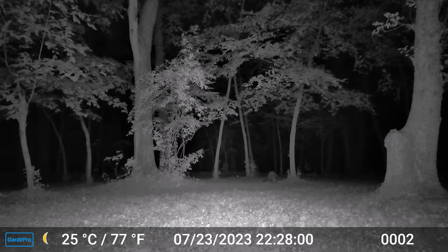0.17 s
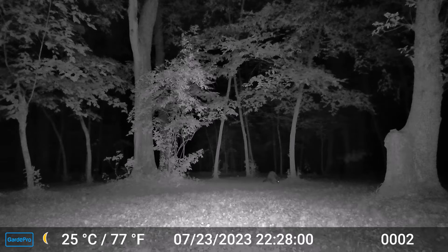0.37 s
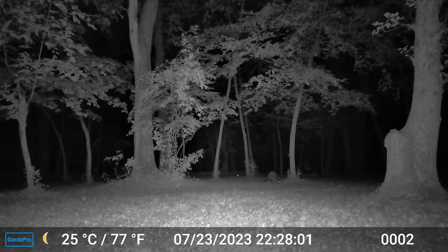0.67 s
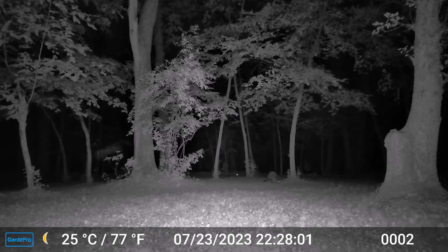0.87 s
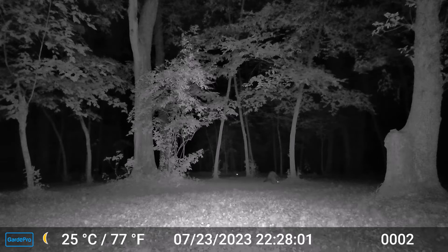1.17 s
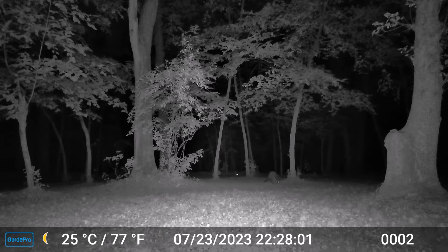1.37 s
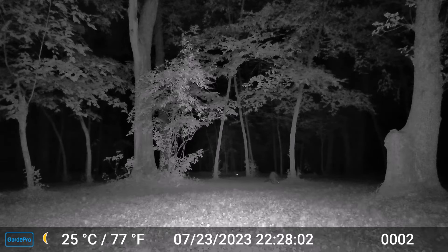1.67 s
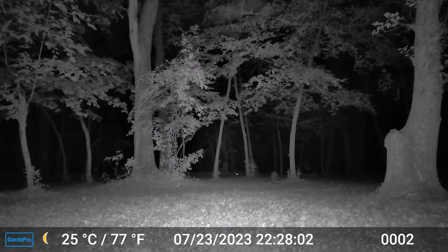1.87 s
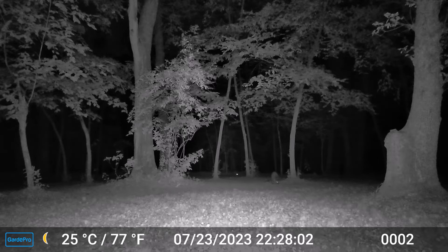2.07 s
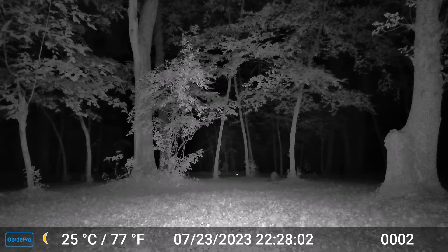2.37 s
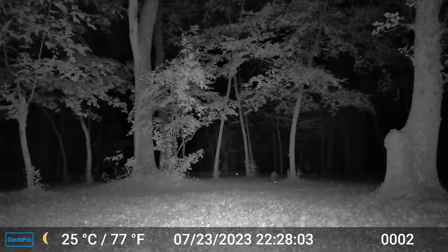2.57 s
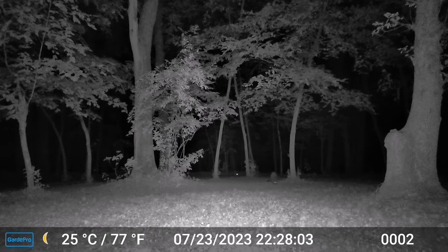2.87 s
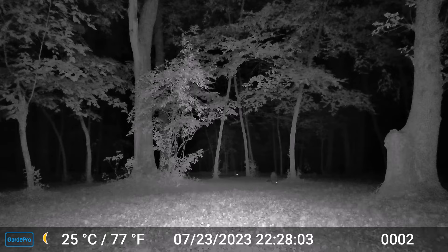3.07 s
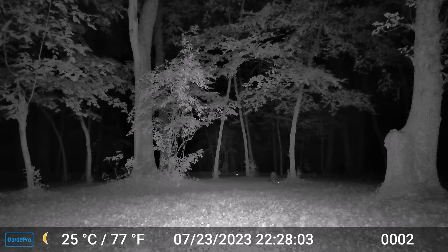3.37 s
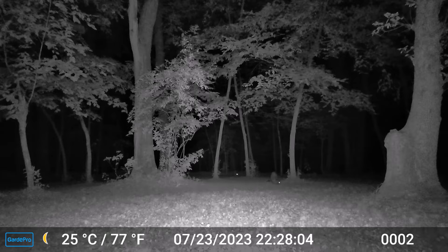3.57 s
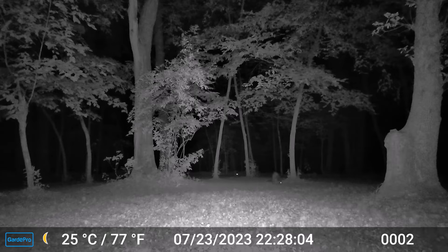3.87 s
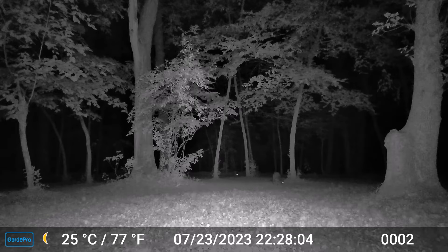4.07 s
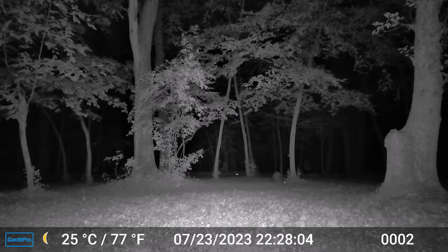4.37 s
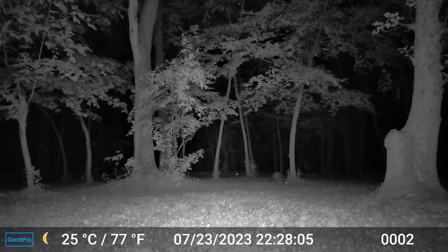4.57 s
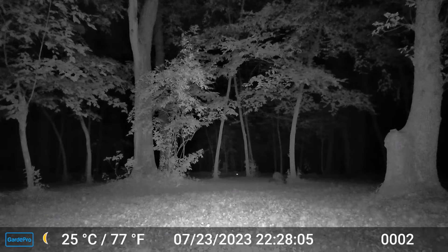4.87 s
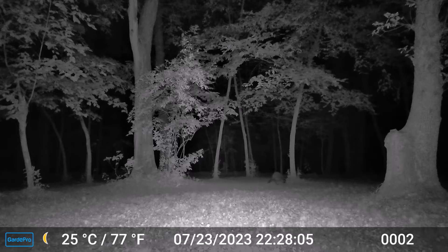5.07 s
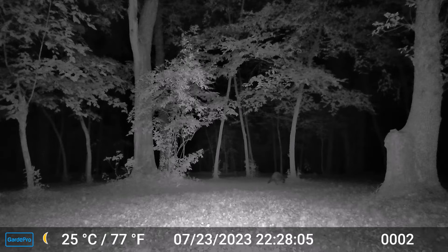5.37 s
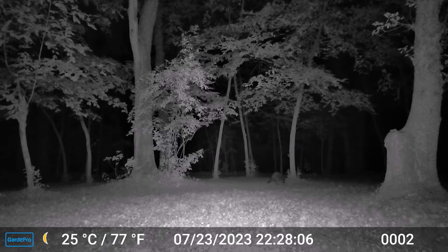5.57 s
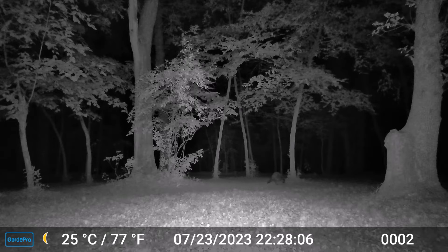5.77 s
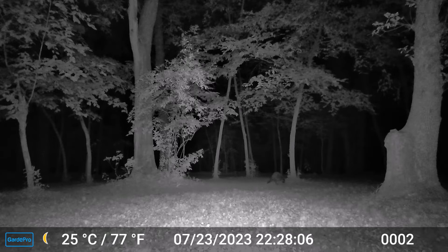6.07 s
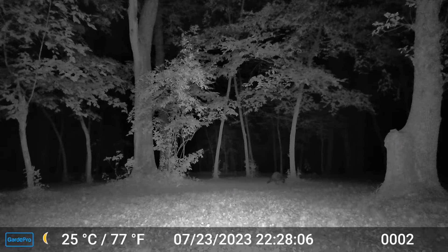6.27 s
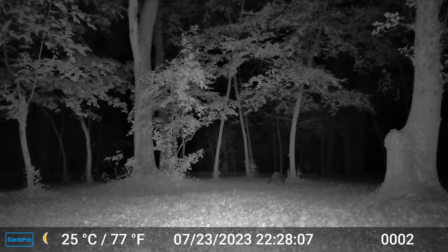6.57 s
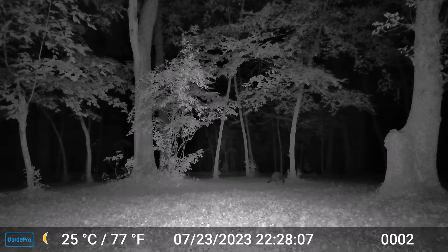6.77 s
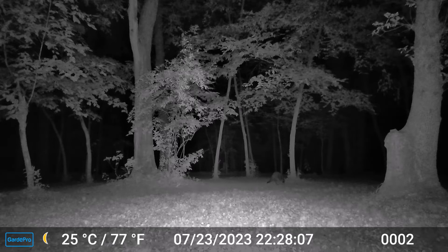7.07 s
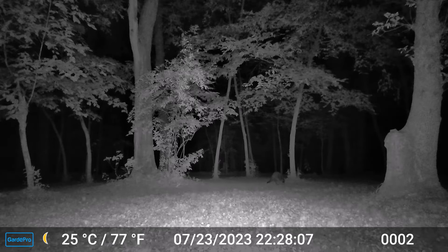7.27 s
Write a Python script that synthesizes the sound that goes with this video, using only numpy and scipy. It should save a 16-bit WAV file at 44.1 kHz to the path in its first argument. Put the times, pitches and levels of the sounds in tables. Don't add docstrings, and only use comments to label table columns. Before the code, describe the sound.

A wooded clearing at night, heard by a small fixed outdoor microphone with dull upper treble and brief digital thinning. A distant katydid is finishing a call at the start while a cricket trills high, near 4.8 kHz. From 0.4 to 1.2 s a near katydid rasps six dry, toothy pulses, buzzing broadly around 2 to 6 kHz with a short woody tail. It returns for its longest phrase at 2.2-3.3 s, again at 4.5-5.4 s, fading away, and at 6.8-7.4 s, growing. Softer, blurred answers come around 1.3-1.6, 2.7-3.5, 4.6-5.0 and 6.2-6.6 s, with a still fainter caller near 1.9, 4 and 5.9 s. Cricket chirps cluster around 0-0.4, 1.4-2.1, 3.4-4.4, 5.5-6.6 and 7.2 s. Throughout, low breeze rumble and irregular soft thumps, strongest before 3.2 s, sit under faint leaf hush, distant drone and high insect chorus.

```python
import sys
import numpy as np
from scipy import signal
from scipy.fft import rfft, irfft, next_fast_len
from scipy.io import wavfile
from scipy.ndimage import uniform_filter1d, map_coordinates

SR = 44100
rng = np.random.default_rng(int(sys.argv[2]) if len(sys.argv) > 2 else 0)


def log_audio(samples):
    frames = np.atleast_2d(samples).T
    limited = np.clip(frames, -1, 1)
    pcm = np.round(limited * 32767).astype(np.int16)
    wavfile.write(sys.argv[1], SR, pcm)


def invert_db(level):
    return 10 ** (np.asarray(level, dtype=float) / 20)


N = 326781


def unit(x):
    return x / np.sqrt(np.mean(x ** 2) + 1e-20)


def along(points, hz):
    f, v = np.transpose(points)
    return np.interp(np.log(hz + 1), np.log(f + 1), v)


def curve(rows):
    return np.interp(np.arange(N) / SR, *np.transpose(rows))


def wobble(rate):
    knots = rng.standard_normal(int(N * rate / SR) + 4)
    return map_coordinates(knots, [np.arange(N) * rate / SR])


def filtered(x, response):
    m = next_fast_len(N + SR // 2)
    return irfft(rfft(x, m) * response(np.fft.rfftfreq(m, 1 / SR)), m)[:N]


def noise(spectrum):
    return unit(filtered(rng.standard_normal(N), lambda hz: invert_db(along(spectrum, hz))))


def resonant(x, modes):
    def response(f):
        rings = []
        for k, (centre, width, db) in enumerate(modes):
            pole = 1j * f * width / (centre * centre - f * f + 1j * f * width)
            rings.append((-1) ** k * invert_db(db) * pole ** 2)
        rings = np.array(rings)
        size = np.sqrt(np.sum(np.abs(rings) ** 2, axis=0))
        return size * np.exp(1j * np.angle(rings.sum(axis=0)))
    return unit(filtered(x, response))


def repeats(phrases, spacing, swell_db, uneven_db):
    rows = []
    for k, (first, last, first_db, last_db) in enumerate(phrases):
        place = np.linspace(0, 1, round((last - first) / spacing) + 1)
        db = first_db + (last_db - first_db) * place + swell_db * np.sin(np.pi * place)
        db = db + uneven_db * rng.standard_normal(len(place))
        rows.append([first + (last - first) * place, db, place, np.full(len(place), k)])
    return np.concatenate(rows, axis=1)


def strokes(times, dbs, rise, fall, edge):
    t = np.arange(N) / SR
    gain = np.zeros(N)
    for s, db in zip(times, dbs):
        near = slice(max(0, int((s - .15) * SR)), int((s + .15) * SR))
        late = t[near] - s
        gain[near] += invert_db(db) * np.exp(-np.abs(late / np.where(late < 0, rise, fall)) ** edge)
    return gain


def file_teeth(rate, scatter, size_db, hiss):
    spacing, size = rng.standard_normal((4000, 2)).T
    at = (np.cumsum(np.clip(1 + scatter * spacing, .2, 3)) * SR / rate).astype(int)
    ticks = np.bincount(at[at < N], invert_db(size_db * size[at < N]), N)
    return unit(ticks - ticks.mean()) + hiss * rng.standard_normal(N)


def wood(x, t60, wet_db):
    t = np.arange(SR) / SR
    tail = rng.standard_normal(SR) * invert_db(-60 * t / t60) * (1 - np.exp(-t / 0.0023))
    trembling = unit(wobble(90))
    return x + invert_db(wet_db) * signal.fftconvolve(x * trembling, tail / np.linalg.norm(tail))[:N]


def wavelets(times, dbs, hz, length, fall):
    out = np.zeros(N)
    phases = rng.uniform(0, 2 * np.pi, len(times))
    for s, db, f, d, phase in np.broadcast(times, dbs, hz, length, phases):
        n = np.arange(int((s - 1.5 * d) * SR), min(N, int((s + 1.5 * d) * SR)))
        u = (n / SR - s) / d
        cycles = f * d * (u - fall * u ** 2 / 4)
        out[n] += invert_db(db) * np.exp(-2 * u ** 2) * np.sin(2 * np.pi * cycles + phase)
    return out


def near_katydid():
    # (first [s], last [s], first level [dB], last level [dB])
    phrases = [
        (.443, 1.195, -38.5, -38.5),
        (2.192, 3.253, -37, -38.5),
        (4.492, 5.4, -36.5, -42.5),
        (6.812, 7.422, -39.5, -36),
    ]
    lower_hz = [1540, 1640, 2050, 2110, 2180, 2310, 2500, 2680]
    middle_hz = [2908, 3037, 3146, 3250, 3345, 3545, 3500, 3751, 3900]
    upper_hz = [4161, 4275, 4421, 4620, 4720, 4825, 4959, 5168, 5370, 5558, 5698, 6000, 7250]
    # (width [Hz], level [dB])
    lower_ring = [(80, -28.5), (80, -22), (80, -8), (71, -11), (70, -14), (90, -13.5), (90, -11),
                  (122, -12)]
    middle_ring = [(72, -7.5), (90, -9.5), (36.6, -1), (140, -8.5), (50, -11.5), (50, -9), (500, -18),
                   (59.7, -13), (300, -16)]
    upper_ring = [(90, -6.5), (44, -4), (80, -8), (113, -3.5), (141, -8.5), (100, -9), (50, -5),
                  (199, -18.5), (167, -10), (60, -17.5), (49.7, -11.5), (490, -27.5), (298, -37)]
    # (first level [dB], last level [dB])
    upper_phrase = [(4, -1), (2.5, 0), (1.3, 1.9), (4.5, -0.7)]
    lower_phrase = [(0.53, 0.9), (1, -1), (.2, -0.5), (.3, -0.4)]

    s, db, place, phrase = repeats(phrases, spacing=.151, swell_db=1.5, uneven_db=.25)

    def effort(cell):
        first, last = np.array(cell)[phrase.astype(int)].T
        return db + first * (1 - place) + last * place

    def ring(modes):
        return resonant(file_teeth(rate=330, scatter=.15, size_db=3, hiss=.5), modes)

    upper_db, lower_db = effort(upper_phrase), effort(lower_phrase)
    low, high = np.c_[lower_hz, lower_ring], np.c_[upper_hz, upper_ring]
    lower = strokes(s - .008, lower_db - 7.5, rise=.036, fall=.042, edge=1.97) * invert_db(2.44 * wobble(50))
    low_rim = strokes(s + .018, lower_db - 13.5, rise=.028, fall=.026, edge=1.8) * invert_db(2.4 * wobble(40))
    middle = strokes(s + .011, db + 3.5, rise=.037, fall=.03, edge=1.94) * invert_db(1.8 * wobble(45))
    upper = strokes(s + .001, upper_db - .6, rise=.047, fall=.039, edge=2.97) * invert_db(.85 * wobble(60))
    rim_db = upper_db - 5.5 - 3.5 * place
    high_rim = strokes(s + .0086, rim_db, rise=.043, fall=.031, edge=1.8) * invert_db(2.2 * wobble(30))

    wings = lower * ring(low[:5]) + low_rim * ring(low[5:])
    wings += middle * ring(np.c_[middle_hz, middle_ring])
    wings += upper * ring(high[:7]) + high_rim * ring(high[7:])
    return wood(wood(wings, t60=.5, wet_db=-10.5), t60=1.6, wet_db=-21)


def far_katydid(phrases, wing, late, rise, fall, level_db, wet_db):
    s, db = repeats(phrases, spacing=.157, swell_db=.6, uneven_db=.6)[:2]
    teeth = file_teeth(rate=280, scatter=.3, size_db=3, hiss=1.5)
    song = strokes(s + late, db + level_db, rise, fall, edge=2.6) * resonant(teeth, wing)
    return wood(song, t60=.4, wet_db=wet_db)


def second_katydid():
    # (first [s], last [s], first level [dB], last level [dB])
    phrases = [
        (.001, .162, -48, -50.5),
        (1.335, 1.645, -52, -51),
        (2.73, 3.483, -42, -52),
        (4.57, 5.03, -42.5, -50),
        (6.195, 6.64, -48, -48),
    ]
    # (pitch [Hz], width [Hz], level [dB])
    low_wing = [(2200, 150, -1), (2370, 190, 0), (2560, 190, -3)]
    high_wing = [(2700, 200, -5), (2950, 250, -5), (3270, 170, 0), (3480, 180, -2.5)]
    lower = far_katydid(phrases, low_wing, late=-.003, rise=.042, fall=.022, level_db=-1.5, wet_db=-6)
    upper = far_katydid(phrases, high_wing, late=.008, rise=.042, fall=.025, level_db=-3, wet_db=-5)
    return lower + upper


def third_katydid():
    # (first [s], last [s], first level [dB], last level [dB])
    phrases = [
        (.329, .33, -62, -62),
        (1.802, 1.954, -62, -63),
        (3.731, 4.218, -58, -59.5),
        (5.7, 6.041, -63, -62),
    ]
    # (pitch [Hz], width [Hz], level [dB])
    wing = [(2960, 350, -3), (3200, 300, 9)]
    return far_katydid(phrases, wing, late=.004, rise=.035, fall=.025, level_db=-3, wet_db=-8)


def cricket():
    # (first pulse [s], last pulse [s], first level [dB], last level [dB])
    chirps = [(.025, .157, -53, -62), (.187, .352, -50.5, -56.5), (1.352, 1.53, -52, -56),
              (1.637, 1.84, -54, -62), (1.875, 2.108, -66, -45.5), (3.384, 3.563, -53, -56.5),
              (3.628, 3.818, -55.5, -56.5), (3.872, 4.067, -55.5, -55), (4.155, 4.36, -55.5, -54),
              (5.49, 5.6, -55, -61.5), (5.659, 5.83, -50, -60), (5.875, 6.05, -52, -58.5),
              (6.135, 6.31, -55.5, -56.5), (6.37, 6.625, -53, -59), (7.17, 7.235, -48.5, -52)]
    # (frequency [Hz], level per Hz [dB])
    trill = [(4600, -30), (4750, -5), (4840, 0), (4930, -5), (5080, -30)]
    s, db = repeats(chirps, spacing=.034, swell_db=4, uneven_db=1.2)[:2]
    late, sharp = rng.standard_normal((len(s), 2)).T
    pulses = wavelets(s + .002 * late, db, 4840 * (1 + .004 * sharp), length=.013, fall=.085)
    return wood(pulses, t60=.18, wet_db=-3.5) + invert_db(-64 + 2 * wobble(30)) * noise(trill)


def breeze():
    # (time [s], peak level [dB], pitch [Hz])
    bumps = [(.087, -35.5, 74.5), (.387, -31.5, 81), (.753, -26, 83.5), (.899, -32.5, 92.5),
             (1.095, -31, 85), (1.221, -30.5, 93), (1.317, -30.5, 100), (1.566, -33.5, 103),
             (1.849, -32.5, 101.5), (1.917, -32, 103), (2.127, -30.5, 89), (2.424, -34, 90),
             (2.516, -33, 80), (2.624, -28.5, 76.4), (2.817, -34, 80.6), (2.948, -34, 75.7),
             (3.017, -31.5, 121), (3.048, -29, 118), (3.129, -28, 60), (3.404, -33.5, 84),
             (3.443, -30.5, 78), (4.018, -31.5, 76), (4.177, -31, 90), (4.667, -34.5, 110),
             (5.026, -30.5, 117), (5.234, -33.5, 86.4), (5.395, -33, 78), (5.694, -36, 90),
             (7.064, -33.5, 81), (7.218, -32, 74.4)]
    # (time [s], level [dB])
    gusts = [(0, -51), (.6, -51.5), (.91, -49.5), (1.4, -52), (1.75, -47.5), (2.08, -49), (3.0, -45.5),
             (3.8, -51), (4.4, -50), (5, -47.5), (5.6, -51), (6.2, -52.5), (7.41, -51.5)]
    # (frequency [Hz], level per Hz [dB])
    rumble_band = [(12, -35.5), (20, -10.5), (54, 0), (86, -3), (141, -5.5), (260, -25), (340, -62.5),
                   (570, -120)]
    gust_db = curve(gusts)
    eddies = 64
    when, size, pitch = rng.uniform(size=(eddies, 3)).T
    at = (np.arange(eddies) + when) / eddies * N / SR
    over_mean = gust_db[(at * SR).astype(int)] - gust_db.mean()
    small_db = -39.5 + 1.1 * over_mean + 8 * (size - .5)
    small = np.c_[at, small_db, 62 * 2.1 ** pitch]
    s, db, hz = np.r_[bumps, small].T
    rumble = invert_db(gust_db + 2.4 * wobble(12)) * noise(rumble_band)
    return wavelets(s, db - .5, hz, length=1.03 / hz, fall=.1) + invert_db(2.5) * rumble


def background():
    # (time [s], level [dB])
    drone_swell = [(0, -61), (.49, -62.5), (.8, -57), (1.46, -63), (2.08, -52), (2.66, -58.5),
                   (3.82, -58.5), (4.35, -65), (5.04, -56), (5.57, -60), (6.38, -65), (6.81, -62.5),
                   (7.41, -63.5)]
    # (frequency [Hz], level per Hz [dB])
    drone_band = [(150, -9.5), (230, -4.5), (300, -5), (400, -3), (480, -8.5), (600, -21), (900, -58)]
    chorus_band = [(5200, -42), (5800, -9), (6300, -1), (6850, -6.5), (7200, -18), (7800, -35.5)]
    hush_band = [(100, -12), (500, -6.5), (700, -6.5), (1300, -10), (2000, -3.5), (2500, -7), (3000, 1),
                 (3700, -6.5), (4500, -1), (4850, -1.5), (5500, -8.5), (7000, -19.5), (7800, -24),
                 (8400, -65)]
    # (time [s], peak level [dB], pitch [Hz], length [s])
    groans = [
        (2.4, -57, 450, .06),
        (5.025, -46, 350, .022),
        (3.68, -59, 420, 0.027),
    ]
    drone = invert_db(curve(drone_swell) - 2.17 + 1.9 * wobble(10)) * noise(drone_band)
    drone += wavelets(*np.transpose(groans), fall=-.06)
    chorus = invert_db(-62.5 + .44 * wobble(2.9) + .24 * wobble(36)) * noise(chorus_band)
    hush = invert_db(-58 + .35 * wobble(3)) * noise(hush_band)
    return drone + chorus + hush


def scene():
    katydids = near_katydid() + second_katydid() + third_katydid()
    return (katydids + cricket() + breeze() + background())[None]


def thinned(x):
    # (time [s], length [hops], weakest kept under the strongest tone [dB])
    moments = [(.175, 2, -13), (.865, 1, -16), (1.271, 1, -18), (1.474, 2, -13), (1.719, 1, -12),
               (2.021, 1.4, -15), (2.445, 1, -13), (4.3, 1, -13), (4.344, 1, -9), (4.43, 1, -18),
               (4.578, 1, -20), (4.792, 1, -30), (4.898, 1, -15), (5.368, 1, -16), (5.432, 1, -20),
               (5.633, 2, -10), (6.306, 1, -13), (7.246, 1, -13), (7.394, 1, -14)]
    hop = 1024
    n, hz = np.arange(-2 * hop, 2 * hop), np.fft.rfftfreq(4 * hop, 1 / SR)
    out = np.pad(x, (0, 2 * hop))
    for s, hops, keep_db in moments:
        away = np.clip((np.abs(n) - (hops - 1) * hop / 2) / hop, 0, 1)
        here = int(s * SR) + n
        part = out[here]
        level = np.abs(rfft(part * np.cos(away * np.pi / 2) ** 2)) ** 2
        level = uniform_filter1d(level, size=11) * (hz > 1000)
        threshold = level.max() * invert_db(2 * keep_db)
        weak = (hz > 450) / (1 + (level / threshold) ** 6)
        out[here] -= (1 - np.sin(away * np.pi / 2)) * irfft(rfft(part) * weak)
    return out[:N]


def roll_off(x):
    return signal.sosfilt(signal.butter(12, 8040, fs=SR, output="sos"), x)


def record(dry):
    x = filtered(thinned(dry[0]), lambda hz: 1 / (1 + (hz / 7900) ** 60))
    x = x + invert_db(-89) * rng.standard_normal(N)
    return roll_off(x[None])


dry = scene()
out = record(dry)
log_audio(out)
```